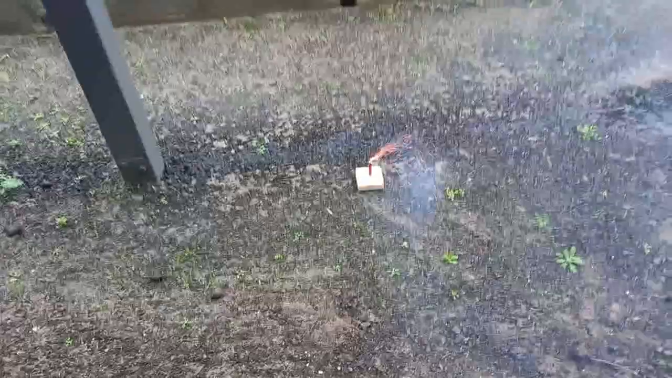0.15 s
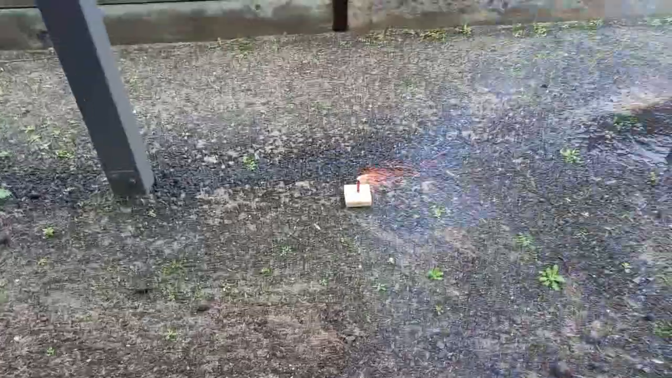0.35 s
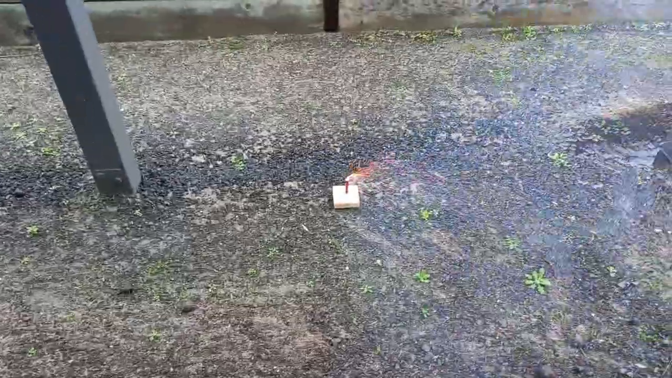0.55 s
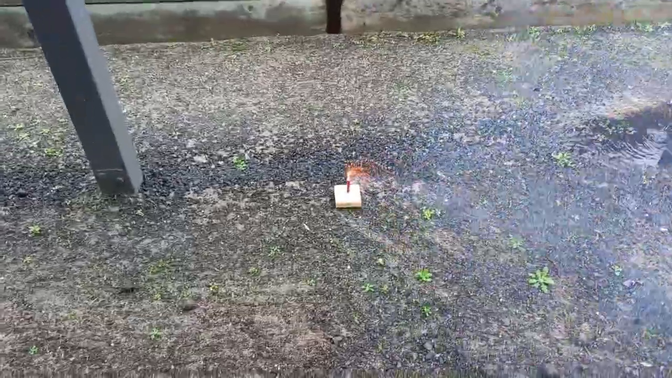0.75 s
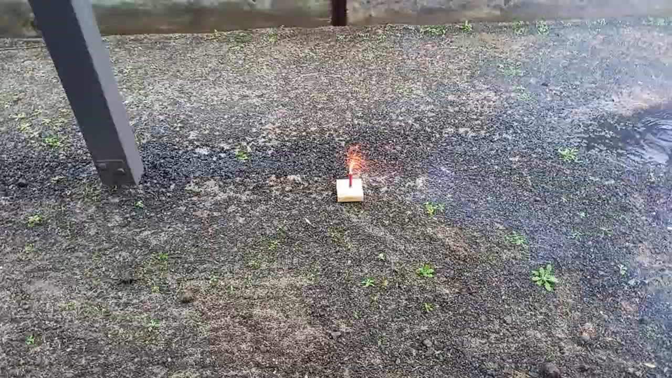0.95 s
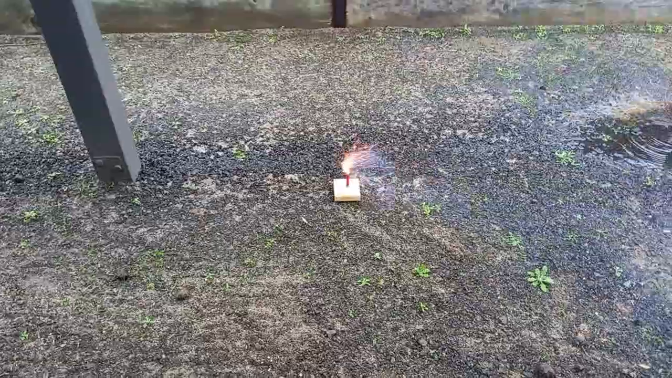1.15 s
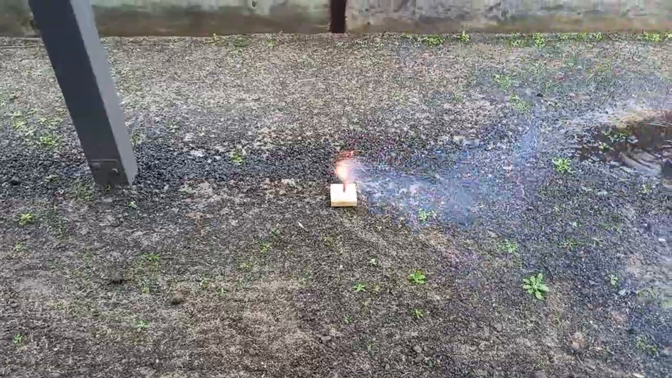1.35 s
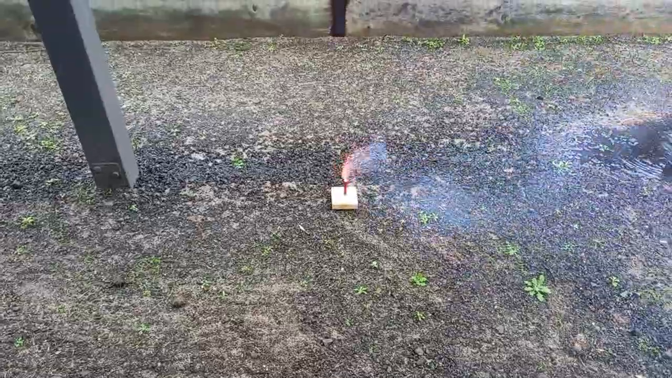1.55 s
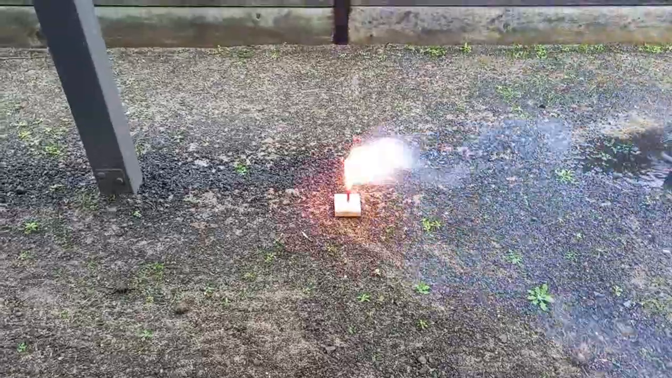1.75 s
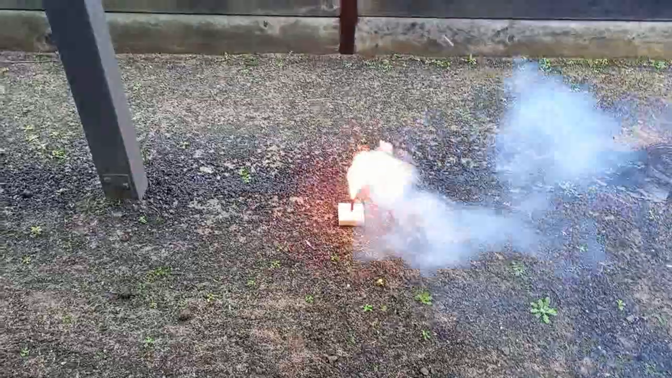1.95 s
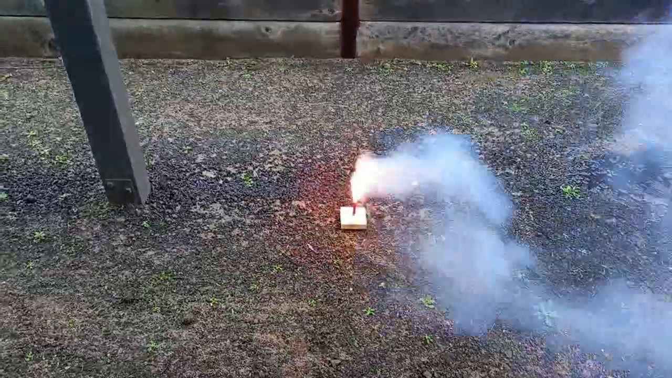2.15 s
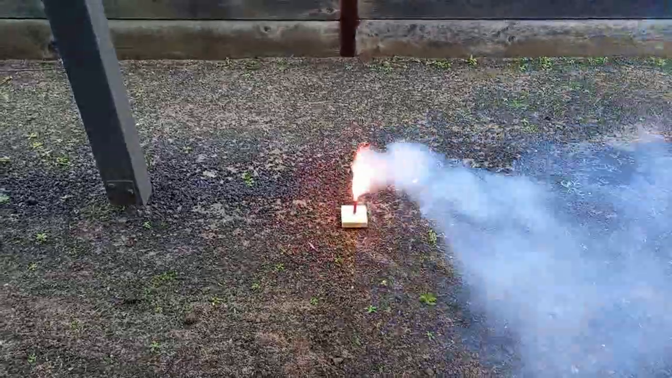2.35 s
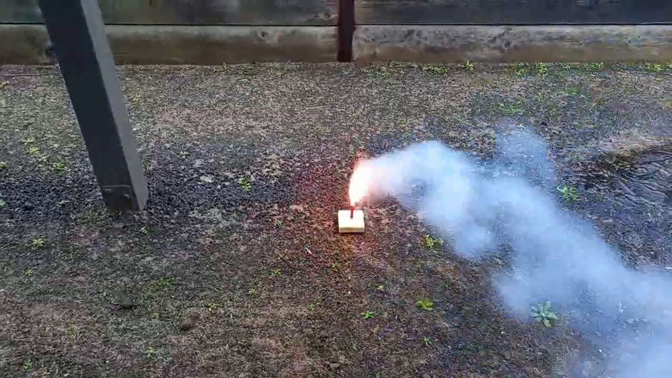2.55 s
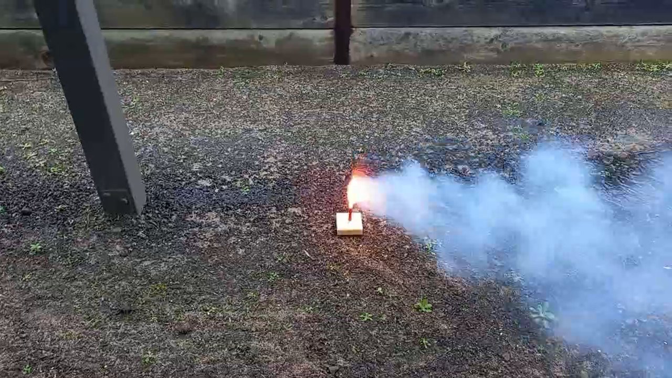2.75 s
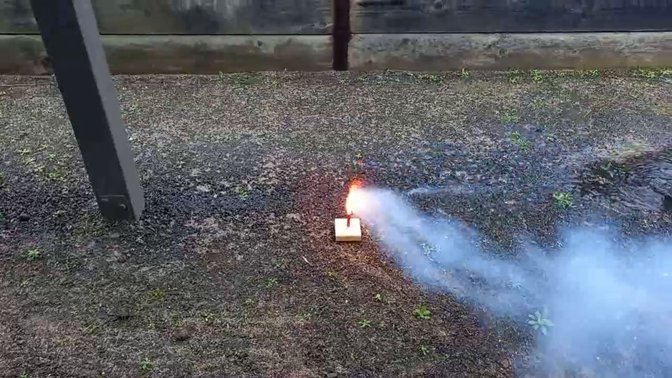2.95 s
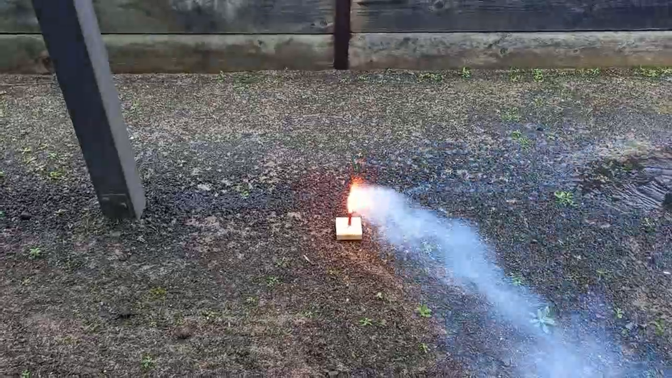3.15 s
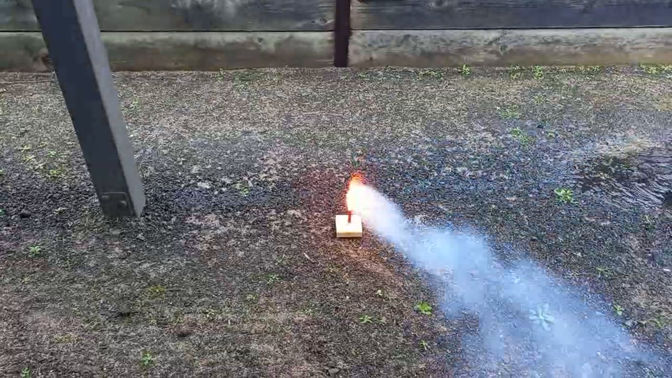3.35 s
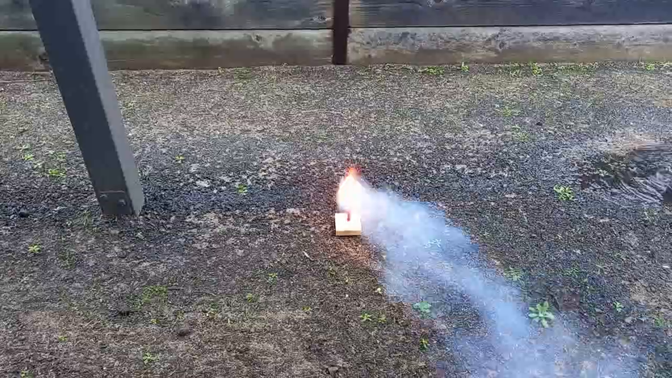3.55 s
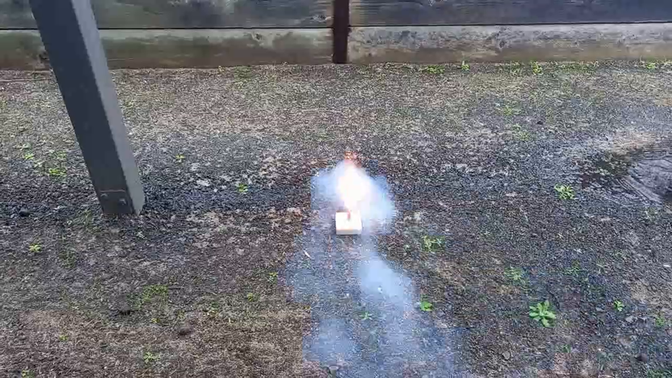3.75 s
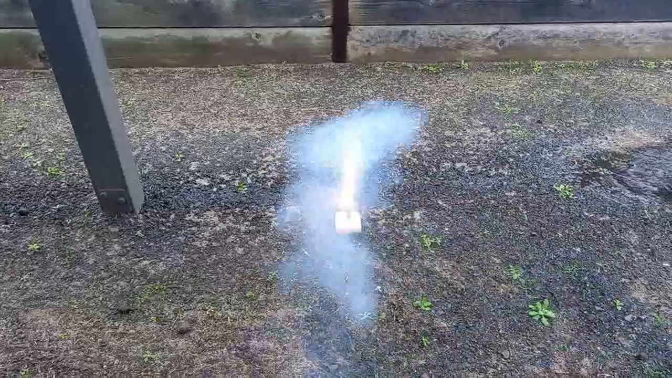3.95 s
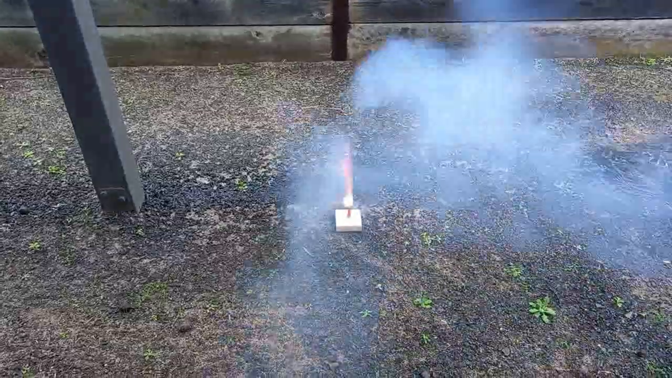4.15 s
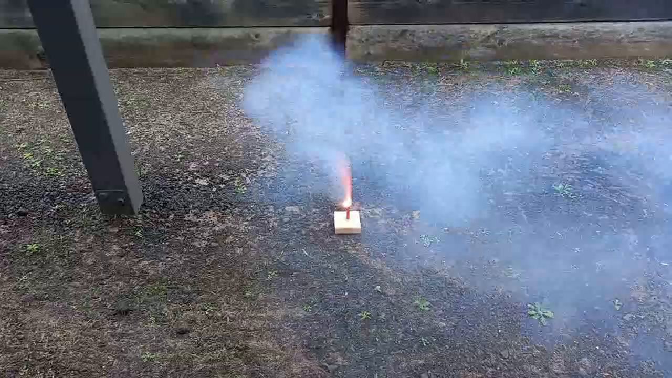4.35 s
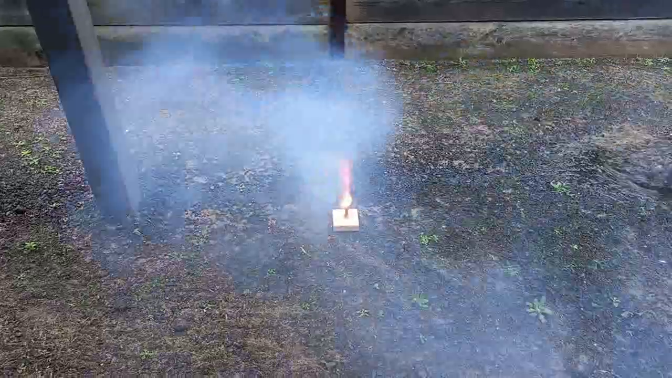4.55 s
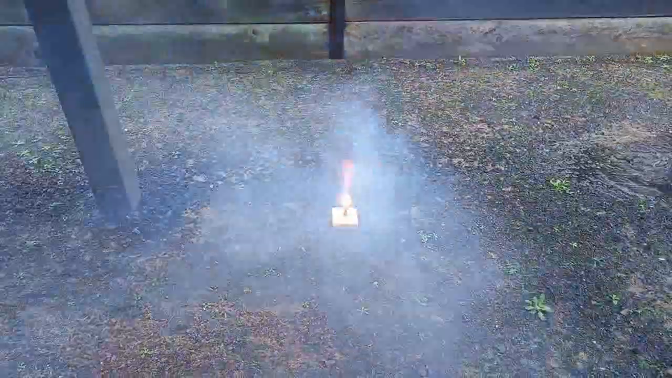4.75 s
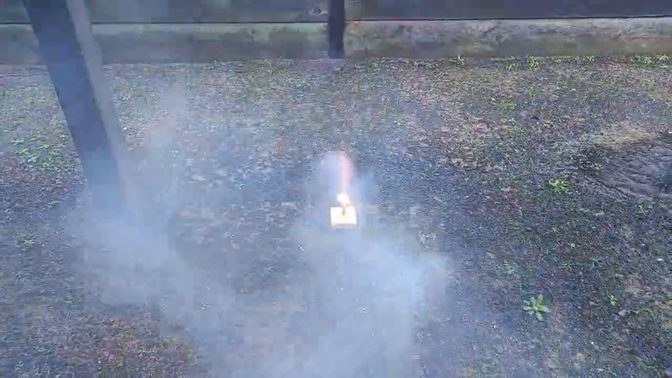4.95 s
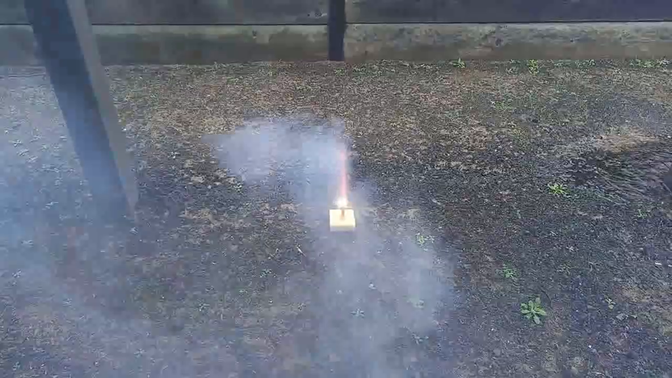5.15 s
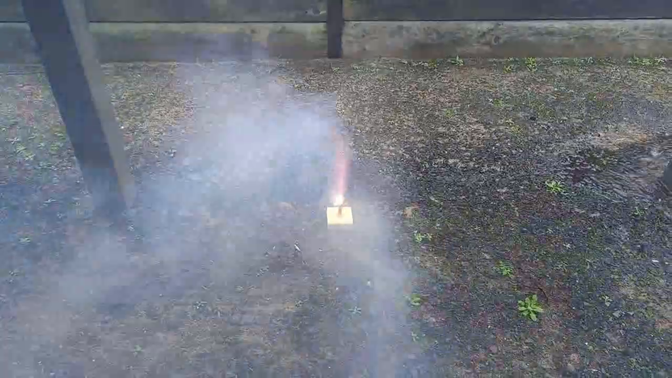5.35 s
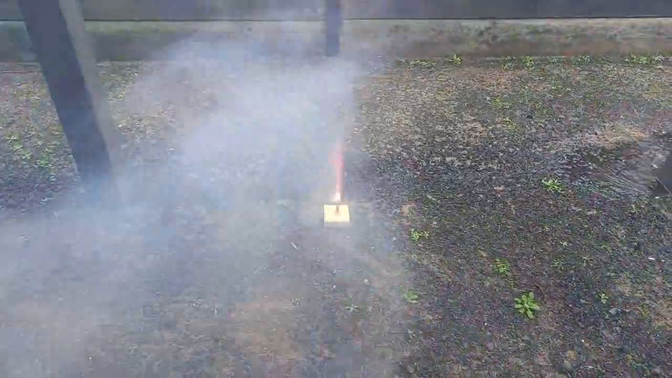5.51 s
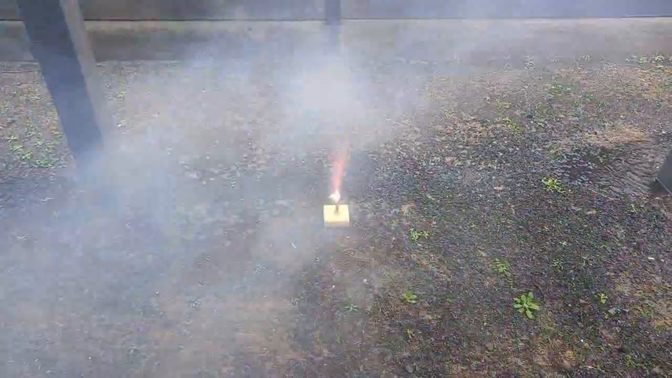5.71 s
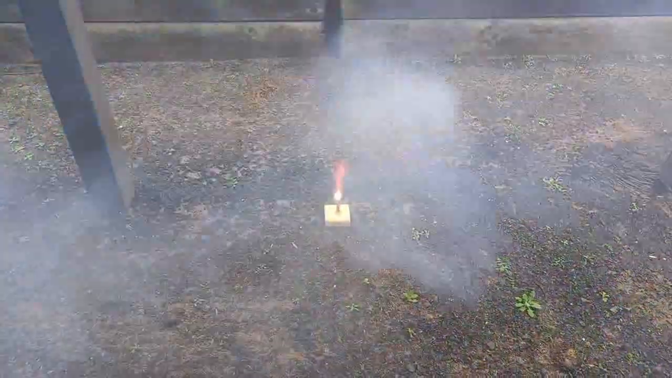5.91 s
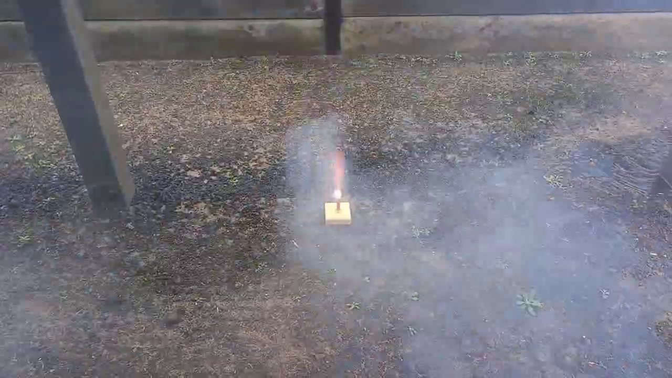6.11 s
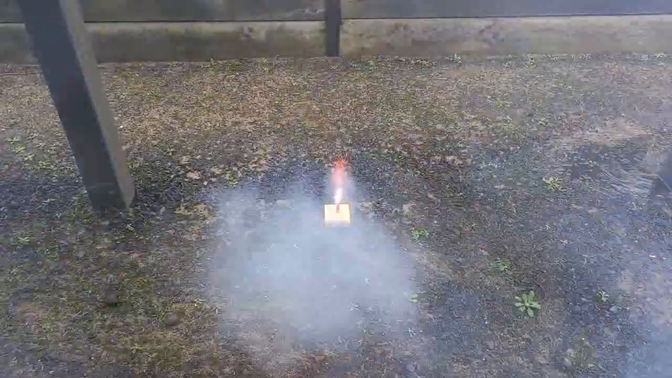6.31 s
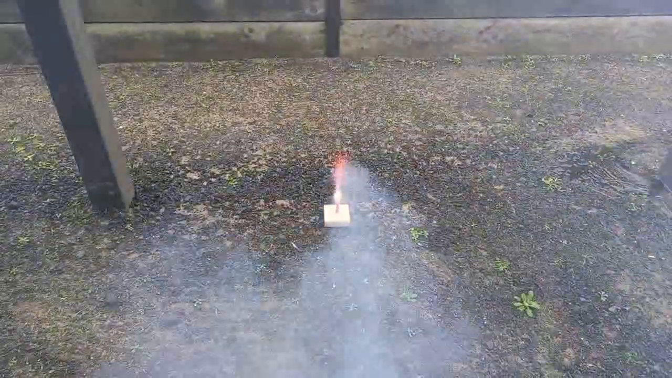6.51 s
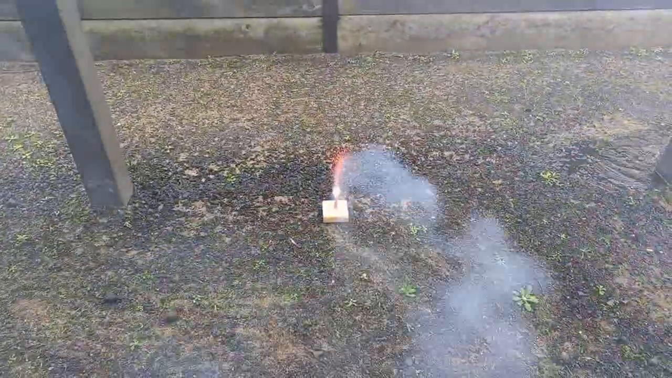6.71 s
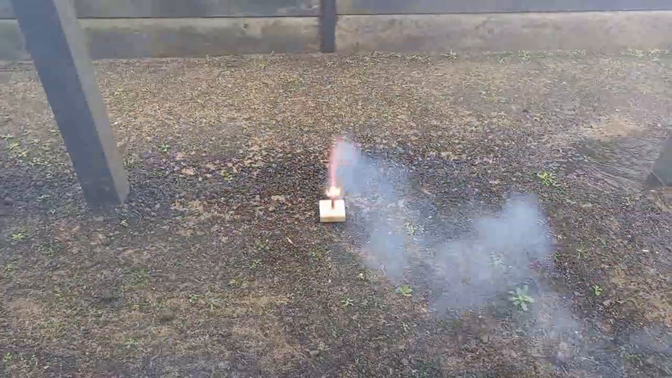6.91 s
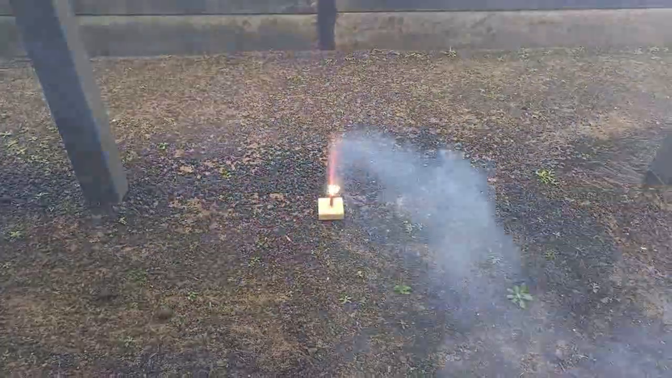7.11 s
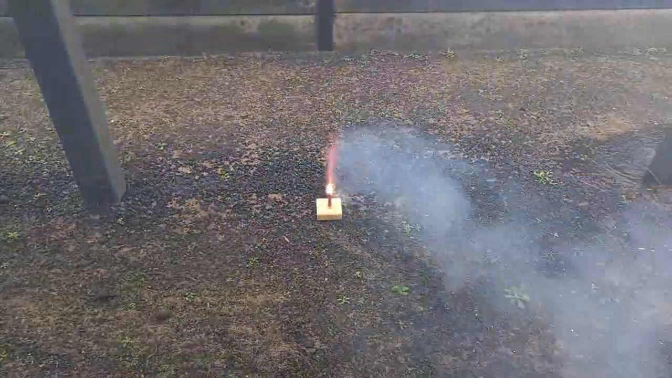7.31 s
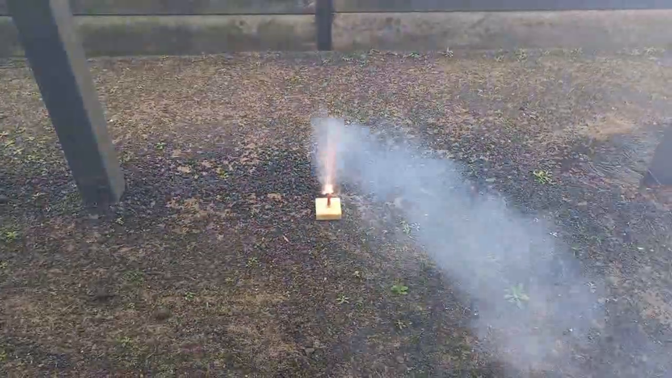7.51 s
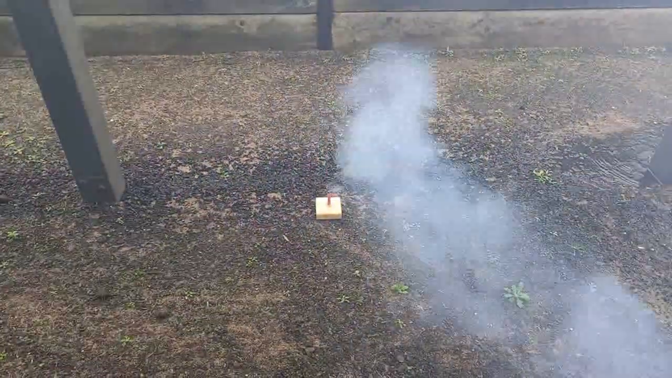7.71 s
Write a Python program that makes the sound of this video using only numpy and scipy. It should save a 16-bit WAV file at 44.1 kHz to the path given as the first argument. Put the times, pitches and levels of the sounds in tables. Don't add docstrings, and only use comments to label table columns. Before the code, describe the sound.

Wind-buffeted fuse fizzes faintly outdoors, pops alight, roars briefly, then a piercing whistle slides steadily down in pitch and cuts off dead.

```python
import sys
import numpy as np
from scipy import signal
from scipy.fft import rfft, irfft, next_fast_len
from scipy.io import wavfile
from scipy.ndimage import uniform_filter1d, minimum_filter1d, map_coordinates

SR = 44100
rng = np.random.default_rng(int(sys.argv[2]) if len(sys.argv) > 2 else 0)


def bounce(signal):
    frames = np.transpose(np.atleast_2d(signal))
    limited = np.clip(frames, -1, 1)
    pcm = np.round(limited * 32767).astype(np.int16)
    wavfile.write(sys.argv[1], SR, pcm)


def makeup_ratio(level_db):
    decades = np.asarray(level_db, float) / 20
    return 10 ** decades


N = 347067
T = np.arange(N) / SR

# time in seconds, level in dB.
BREEZE = [
    (0, -38),
    (1.26, -34.5),
    (1.29, -53.5),
    (7.87, -68.5),
]
# peak in seconds, level in dB, swell in seconds.
GUSTS = [(.2, -23, 0.037), (.31, -34.5, .035), (.48, -23, 0.03), (.6, -34.5, .05), (.92, -34, 0.095),
         (1.22, -16.5, 0.051), (1.45, -45, .08), (1.6, -40.5, 0.032), (1.82, -32.5, 0.042),
         (2.25, -43.5, 0.17), (2.65, -48, .1), (3.13, -45, 0.14), (3.5, -45.5, 0.077), (3.98, -53, .14),
         (4.17, -43, .03), (4.36, -44, 0.044), (4.6, -49.5, 0.41), (5.09, -46, .04), (5.35, -48.5, 0.076),
         (5.75, -55, 0.23), (6.4, -43.5, 0.061), (6.71, -50, 0.043)]
# frequency in Hz, density in dB per Hz.
WIND_COLOUR = [(20, -41), (40, -11.5), (62, 2), (120, -2.5), (200, -8), (350, -11), (700, -38.5)]
# time in seconds, peak in dB, pitch in Hz, length in seconds.
WIND_SLAPS = [(.165, -38, 109, 0.0063), (.17, -24, 300, .004), (.212, -22, 260, 0.0045),
              (.295, -22, 88, 0.013), (.912, -3.5, 119.6, 0.0048), (.953, -10.5, 115, .005),
              (1.126, -3, 118, 0.0023), (1.145, -18, 138, 0.01), (1.174, -5, 150, 0.0024),
              (1.172, -15, 387, 0.0018), (1.205, -11.5, 81, .010), (1.237, -7, 189, 0.0026),
              (1.243, -6.5, 320, 0.002), (1.253, -8.5, 104, 0.0058), (1.27, -13, 109, 0.002),
              (1.795, -36, 90, .008)]
GUST_LEAN = 0.55
FLUTTER_DB, FLUTTER_DB_PER_DB = -8.5, 0.19

# left delay in seconds, right delay in seconds,
# level in dB.
ECHOES = [
    (.0021, 0.0025, -18.5),
    (.0085, .0079, -13),
    (.017, .0185, -8.5),
    (.031, .029, -12),
    (.048, .052, -11.5),
    (.076, 0.12, -21.5),
]
YARD_T60_S, YARD_DB = 0.25, -1.5

# peak in seconds, fizz in dB, swell in seconds.
FUSE_PUFFS = [
    (.01, -44, 0.057),
    (.22, -45, 0.15),
    (.5, -46.5, 0.075),
    (.65, -43, 0.064),
    (.93, -49, 0.062),
    (1.1, -47.5, 0.3),
    (1.38, -48, .04),
    (1.64, -53, 0.066),
    (1.76, -59, .025),
]
# frequency in Hz, density in dB per Hz.
FUSE_COLOUR = [(120, -9), (250, 4.5), (500, -0.5), (830, -4.5), (1700, -11), (2600, -13.5), (3700, -8),
               (5000, -13), (6100, -6.5), (7600, -10), (9300, -6), (10500, -3.5), (12500, 0.5),
               (15800, -6.5)]
FIZZ_DB, FUSE_BODY_DB, FUSE_BODY_DB_PER_S = -50, -48, -3.5
# start in seconds, peak in dB, pitch in Hz, decay in seconds.
SPARKS = [(.045, -26, 684, 0.013), (.05, -26, 1250, 0.0093), (.055, -30, 2110, 0.013),
          (.425, -33, 1500, 0.018), (.435, -39, 2030, .015), (.449, -30, 1650, 0.017),
          (.466, -34, 1280, .02), (.442, -22, 1100, 0.0072), (.443, -26, 1770, 0.0087),
          (.457, -25, 1420, 0.01), (.458, -29, 1060, 0.023), (.475, -37, 900, 0.018),
          (1.8336, -9.5, 3550, 0.0034), (1.8340, -6.5, 5860, 0.0022), (1.8344, -9, 9050, 0.0022),
          (1.8347, -5, 11700, .003), (1.8344, -8, 14500, .002), (1.8338, -12.5, 1750, 0.0026)]

# time in seconds, roar in dB.
FLAME = [
    (1.82, -40),
    (1.88, -35),
    (2.4, -34.5),
    (2.75, -30),
    (3.12, -30),
    (3.33, -44),
    (4.05, -48),
    (4.9, -55.5),
    (7.62, -54.5),
]
# frequency in Hz, density in dB per Hz.
FLAME_COLOUR = [(35, -44.5), (60, -18), (188, -4), (300, -3.5), (450, -9.5), (520, -2.5), (720, -7),
                (1010, -17.5), (1190, -12), (2100, -13.5), (5000, -18), (8000, -23), (13000, -12),
                (15800, -28)]
FLAME_OUT_S, FLAME_OUT_DB_PER_S = 7.703, -150
RUSH_DB, RUSH_DB_PER_DB = -52, 0.58
HISS_DB, HISS_DB_PER_DB = -52.5, 0.53

# time in seconds, pitch in Hz, level in dB, width in Hz.
BORE = [
    (1.84, 10280, -31.5, 5930),
    (2.1, 9170, -29.5, 4223),
    (2.35, 7920, -36, 2200),
    (2.6, 7083, -33, 1198),
    (2.85, 6620, -26, 349),
    (3.1, 6280, -8, 250),
    (3.4, 6000, -39, 205.6),
]
# time in seconds, pitch in Hz.
WHISTLE_PITCH = [
    (2.9, 6445),
    (3.45, 5887),
    (3.8, 5617),
    (4.4, 4883),
    (5.1, 4306),
    (5.95, 3676),
    (6.5, 3425),
    (6.95, 3225),
    (7.76, 2933),
]
# time in seconds, level in dB, left minus right in dB as the phone drifts.
WHISTLE_LEVEL = [
    (2.75, -42, 4),
    (3.15, -22, 5),
    (3.7, -16, -4),
    (4.55, -16.5, -0.5),
    (4.95, -22, -1.5),
    (5.9, -17.5, -4.5),
    (6.5, -21, 0),
    (7.3, -17, 0.5),
    (7.71, -20.5, 1),
]
# level under the fundamental at 5.5 s in dB, slope in dB per s,
# bend in dB per s squared.
OVERTONES = [
    (-30, -0.04, 0.8),
    (-36.5, 2.5, -1),
    (-52.5, 1.5, 1.2),
]
# time in seconds, change in
# dB, length in seconds.
WHISTLE_BEATS = [(3.05, 2, 0.066), (3.303, 3, 0.012), (3.36, 1, 0.016), (3.546, -4.5, .03),
                 (3.616, -5, 0.017), (3.698, 2, 0.016), (3.742, 4.5, .018), (3.791, -10.5, 0.013),
                 (3.852, 4, .008), (3.945, 2, .018), (4.03, -7.5, 0.028), (4.11, 3.5, .012), (4.33, -4, .04),
                 (4.45, -4.5, 0.023), (4.507, 4, .015), (4.7, -4, .015), (4.81, 5, .03), (4.9, -2, .03),
                 (5.179, 7.5, 0.017), (5.86, 2.5, 0.055), (6.13, 3, .02), (6.388, -2.5, 0.013),
                 (6.78, 2, .04), (6.971, -6, .025), (7.355, -2.5, 0.097)]
BURNOUT_S, BURNOUT_DB_PER_S = 7.712, -800
SKIRT_DB, SKIRT_DB_PER_S = -21.5, -1.74
UNSTEADY_DB, STEADY_S = 1.5, 5.87
IMAGE_HZ = 48000 - 44100
LOWER_IMAGE_DB, UPPER_IMAGE_DB = -41, -43


def curve(table):
    s, *columns = np.transpose(table)
    return [np.interp(T, s, c) for c in columns]


def unit(x):
    return x / np.sqrt(np.mean(np.abs(x) ** 2))


def walk(rate):
    hold = max(int(SR / rate), 2)
    steps = np.repeat(rng.standard_normal(N // hold + 1), hold)
    slewed = uniform_filter1d(uniform_filter1d(steps, hold), hold)
    return unit(slewed[:N])


def gate(start, stop, edge):
    return np.clip((T - start) / edge, 0, 1) * np.clip((stop - T) / edge, 0, 1)


def swells(table, calm_db, fall):
    power = makeup_ratio(2 * calm_db) + 0 * T
    for s, db, length in table:
        side = np.where(T < s, length, fall * length)
        power = power + makeup_ratio(2 * db) * np.exp(-((T - s) / side) ** 2)
    return 10 * np.log10(power)


def bands(x, colour, edges_hz):
    size = next_fast_len(N)
    log_hz = np.log(np.arange(size // 2 + 1) * SR / size + 1)
    knots, db = np.transpose(colour)
    spec = rfft(x, size) * makeup_ratio(np.interp(log_hz, np.log(knots), db))
    out = []
    for share in np.eye(len(edges_hz)):
        weight = np.sqrt(np.interp(log_hz, np.log(edges_hz), share))
        out.append(unit(irfft(spec * weight, size)[..., :N]))
    return out


def sizzle(spread_db, grit):
    grain_db = spread_db * np.minimum(rng.exponential(size=N), 7)
    grains = makeup_ratio(grain_db) * rng.standard_normal(N)
    return rng.standard_normal(N) + grit * unit(grains)


def smear(phase, width_hz):
    clock = np.cumsum(width_hz + 0 * T) / SR
    chance = rng.standard_normal((2, 30000))
    re, im = (map_coordinates(c, [clock], order=1, mode="nearest") for c in chance)
    return re * np.cos(phase) + im * np.sin(phase)


def wind():
    db = swells(GUSTS, curve(BREEZE)[0], fall=0.7)
    flap_db = FLUTTER_DB + FLUTTER_DB_PER_DB * (db + 48.5)
    pan_db = GUST_LEAN * (db + 46.5)
    lean_db = np.array([pan_db, -pan_db]) / 2
    db = np.minimum(db, -31)
    deep, flap = bands(rng.standard_normal((2, N)), WIND_COLOUR, [80, 260])
    swirl_db, flick_db = (2.2 * np.array([walk(rate), walk(rate)]) for rate in (12, 20))
    eddies = deep + makeup_ratio(flap_db - 5.0 + flick_db) * flap
    out = eddies * makeup_ratio(db + 0.5 + lean_db + swirl_db)
    t = np.arange(-2000, 2000) / SR
    for s, peak_db, hz, length in WIND_SLAPS:
        k = int(s * SR)
        bell = np.exp(-(t / length) ** 2 / 2)
        out[0, k - 2000:k + 2000] += makeup_ratio(peak_db) * np.cos(2 * np.pi * hz * t) * bell
    return out


def yard(x, wet_db, count):
    t = np.arange(int(.35 * SR)) / SR
    tail = rng.standard_normal((2, len(t))) * makeup_ratio(-60 * t / YARD_T60_S) * (t > .006)
    response = makeup_ratio(YARD_DB + wet_db) * tail / np.sqrt(np.sum(tail ** 2, axis=1, keepdims=True))
    for left_s, right_s, db in ECHOES:
        response[[0, 1], [int(left_s * SR), int(right_s * SR)]] += makeup_ratio(db + wet_db)
    response[[0, 1], [count, 0]] += 1
    return signal.fftconvolve(x[None], response, axes=1)[:, :N]


def fuse():
    fizz_db = swells(FUSE_PUFFS, FIZZ_DB, fall=0.64)
    body_db = FUSE_BODY_DB + FUSE_BODY_DB_PER_S * T
    body, mid, top = bands(sizzle(spread_db=5.0, grit=0.66), FUSE_COLOUR, [1500, 6000, 12000])
    puff_db, mid_db, top_db = 1.3 * walk(16), .8 * walk(11), 1.4 * walk(11)
    fizz = makeup_ratio(1.0 + puff_db + mid_db) * mid + makeup_ratio(7 + puff_db + top_db) * top
    return gate(-1, 1.84, 0.0041) * (makeup_ratio(fizz_db) * fizz + makeup_ratio(body_db + 5.5) * body)


def sparks(rise):
    out = np.zeros(N)
    t = np.arange(int(.05 * SR)) / SR
    for s, db, hz, t60 in SPARKS:
        k = int(s * SR)
        envelope = (1 - np.exp(-t / rise)) * makeup_ratio(-60 * t / t60)
        out[k:k + len(t)] += makeup_ratio(db) * np.sin(2 * np.pi * hz * t) * envelope
    return out


def flame():
    roar_db, = curve(FLAME)
    rush_db = RUSH_DB + RUSH_DB_PER_DB * (roar_db + 51.5) - roar_db
    hiss_db = HISS_DB + HISS_DB_PER_DB * (roar_db + 54) - roar_db
    roar_db = roar_db + FLAME_OUT_DB_PER_S * np.maximum(T - FLAME_OUT_S, 0)
    noise = sizzle(spread_db=3.5, grit=0.5)
    roar, rush, upper, hiss, air = bands(noise, FLAME_COLOUR, [550, 1800, 4500, 9500, 13500])
    gust_db = 1.15 * walk(10)
    low = makeup_ratio(0.5 + gust_db + 1.2 * walk(24.95)) * roar
    middle = makeup_ratio(rush_db + gust_db + 1.2 * walk(18)) * (rush + makeup_ratio(1.0) * upper)
    spit_db = .9 * gust_db + 1.9 * walk(16)
    air_db = np.interp(T, [2.5, 7.5], [-2.5, 4])
    high = makeup_ratio(hiss_db + spit_db) * (hiss + makeup_ratio(air_db) * air)
    return gate(1.828, 9, 0.0068) * makeup_ratio(roar_db) * (low + middle + high)


def bore():
    hz, db, width_hz = curve(BORE)
    flicker_db = 1.2 * walk(20)
    phase = 2 * np.pi * np.cumsum(hz) / SR
    return gate(1.84, 3.0, 0.029) * makeup_ratio(db + flicker_db) * smear(phase, width_hz)


def whistle():
    hz, = curve(WHISTLE_PITCH)
    db, pan_db = curve(WHISTLE_LEVEL)
    db = db + BURNOUT_DB_PER_S * np.maximum(T - BURNOUT_S, 0)
    surge = walk(25)
    db = db + UNSTEADY_DB * surge * np.clip((STEADY_S - T) / 2, 0, 1)
    tremble_hz = 14 * surge + 12 * walk(200)
    phase = 2 * np.pi * np.cumsum(hz + tremble_hz) / SR
    tone = makeup_ratio(1.3 * walk(90)) * np.sin(phase)
    skirt = makeup_ratio(-7) * smear(phase, width_hz=2000) + makeup_ratio(5.5) * smear(phase, width_hz=500)
    tone += makeup_ratio(SKIRT_DB + SKIRT_DB_PER_S * (T - 3.5)) * skirt
    for harmonic, (at_db, slope_db, bend_db) in enumerate(OVERTONES, start=2):
        over_db = at_db + slope_db * (T - 5.5) + bend_db * (T - 5.5) ** 2
        over_db = over_db + 3 * walk(40) + 1.5 * surge
        below_top = np.clip((16200 - harmonic * hz) / 1200, 0, 1)
        tone += below_top * makeup_ratio(over_db) * np.sin(harmonic * phase)
    image_phase = 2 * np.pi * IMAGE_HZ * T
    lower_db = LOWER_IMAGE_DB + 2.5 * np.log2(np.abs(hz - IMAGE_HZ) / 1500 + .05) - 1.3 * (T - 4)
    tone += makeup_ratio(lower_db) * np.sin(phase - image_phase)
    tone += makeup_ratio(UPPER_IMAGE_DB) * np.sin(phase + 0.97 * image_phase)
    tone += makeup_ratio(-40 - 9 * np.abs(T - 3.6)) * np.sin(2 * phase - image_phase)
    return gate(3.0, 7.8, 0.026) * makeup_ratio(db + 11.5) * tone, pan_db


def beats():
    return sum(db * np.exp(-((T - s) / length) ** 2) for s, db, length in WHISTLE_BEATS)


def scene():
    tone, pan_db = whistle()
    lean_db = np.array([pan_db, -pan_db]) / 2
    song = yard(tone, wet_db=-3.5, count=3) * makeup_ratio(-3.5 + beats() + lean_db)
    fire = yard(fuse() + flame() + bore(), wet_db=-3.0, count=2)
    pops = yard(sparks(rise=0.000061), wet_db=-1, count=2)
    return wind() + fire + pops + song


def limit(x, top):
    peak = -minimum_filter1d(-np.abs(x).max(axis=0), size=600)
    swell = uniform_filter1d(peak, size=600)
    return x / (1 + (swell / top) ** 4) ** .25


def mask(x, under_db, slope_db, upto_hz, top_under_db, top_slope_db, top_hz):
    hz, _, spec = signal.stft(x, SR, nperseg=1024)
    power = (np.abs(spec[:, :512]) ** 2).reshape(2, 64, 8, -1).mean(axis=2)
    level = 10 * np.log10(power + 1e-18)
    centre = hz[4:512:8, None]
    peak = uniform_filter1d(power.max(axis=1, keepdims=True), size=3, axis=2)
    loudest = 10 * np.log10(peak + 1e-18)
    tone_hz = centre[level.argmax(axis=1), 0][:, None]
    near = (centre > 1.09 * tone_hz) & (centre < np.minimum(upto_hz, 1.8 * tone_hz))
    hidden = near & (level < loudest - under_db - slope_db * np.log2(6500 / tone_hz))
    hidden |= (centre > 6500) & (centre < 8200) & (level < loudest - 46)
    top_floor = loudest - top_under_db + top_slope_db * np.log2(centre / top_hz)
    hidden |= (centre > top_hz) & (level < top_floor)
    spec[:, :512] *= np.repeat(~hidden, 8, axis=1)
    return signal.istft(spec, SR, nperseg=1024)[1][:, :N]


def band_limit(x):
    return signal.sosfilt(signal.butter(12, 17030, fs=SR, output="sos"), x)


def record(dry):
    x = limit(dry, top=.75)
    x = mask(x, under_db=33, slope_db=20, upto_hz=8900, top_under_db=60, top_slope_db=60, top_hz=14200)
    low_pass = signal.ellip(8, .2, 70, 15900, fs=SR, output="sos")
    return band_limit(signal.sosfilt(low_pass, x))


dry = scene()
out = record(dry)
bounce(out)
```